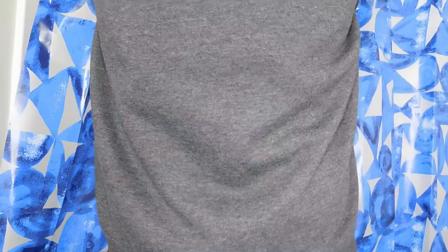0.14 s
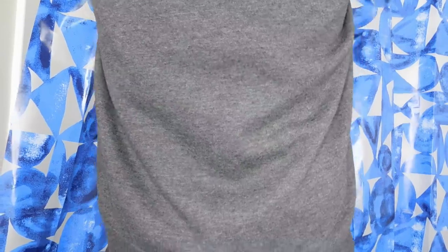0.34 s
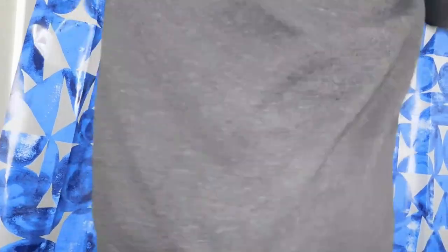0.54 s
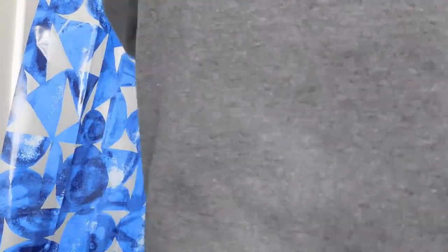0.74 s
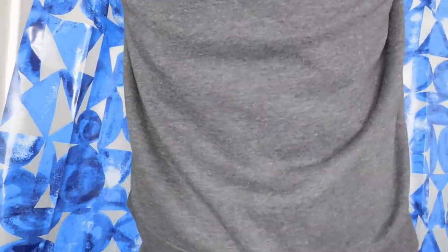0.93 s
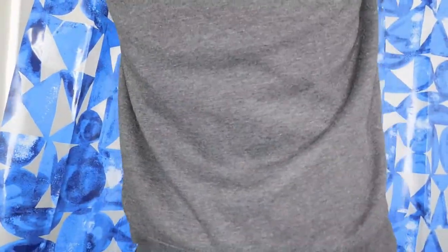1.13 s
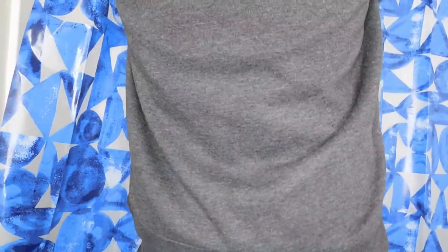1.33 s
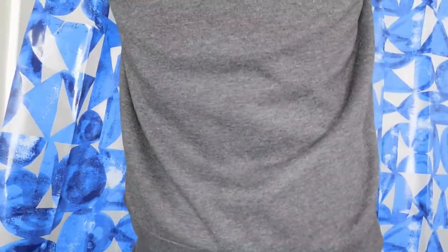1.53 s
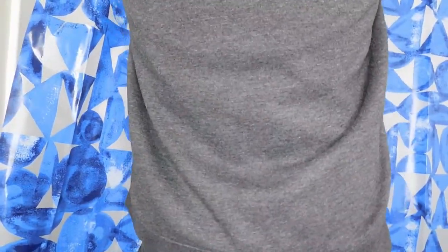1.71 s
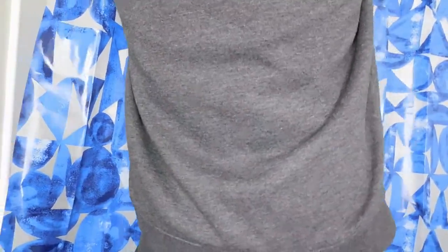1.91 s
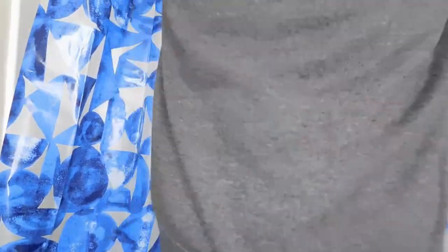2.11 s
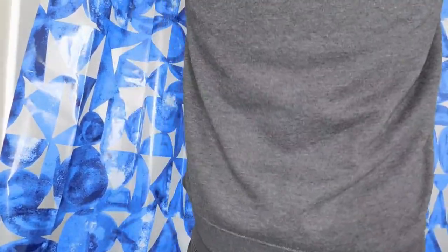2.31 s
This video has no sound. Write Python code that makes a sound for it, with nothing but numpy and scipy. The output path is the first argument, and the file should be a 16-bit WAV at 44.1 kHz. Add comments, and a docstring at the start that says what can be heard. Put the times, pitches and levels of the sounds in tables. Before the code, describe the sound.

Plastic shower curtain rings are hooked onto a rod, close by in a small bathroom. One snaps shut sharply, then rings clack together and knock the rod, while the curtain crinkles and rustles over a faint hiss.

```python
"""Plastic shower curtain rings are hooked onto a rod, close by in a small bathroom.
A ring scrapes over its catch, snaps home and rattles; rings knock the rod and clack together.
The curtain crinkles in short ticks as creases flip over, and rubs along itself in grainy strokes.
Handling stirs faint low booms, over a steady hiss."""
import sys
import numpy as np
from scipy import signal
from scipy.fft import rfft, irfft, next_fast_len
from scipy.io import wavfile
from scipy.ndimage import map_coordinates

SR = 44100
rng = np.random.default_rng(int(sys.argv[2]) if len(sys.argv) > 2 else 0)


def inscribe(sig):
    """Save sig as 16-bit PCM at rate SR to the path in sys.argv[1].

    A 1-D sig is mono; a 2-D sig holds one channel per row.
    Samples are clipped to [-1, 1] before scaling.
    """
    pcm = np.round(np.clip(np.atleast_2d(sig).T, -1, 1) * 32767)
    wavfile.write(sys.argv[1], SR, pcm.astype(np.int16))


N = 103635
TIME_S = np.arange(N) / SR
CONTACT_S = np.arange(-SR // 100, SR // 16) / SR  # time around a contact at 0
AFTER_S = np.maximum(CONTACT_S, 0)
NEAR_CORRELATION = 0.28  # left to right


def amp(db):
    return 10 ** (np.asarray(db) / 20)


def unit_rms(x):
    return x / np.sqrt(np.mean(x ** 2) + 1e-20)


def fixed_energy(x):
    """Scale to the energy of 2 ms at rms 1."""
    return unit_rms(x) * np.sqrt(0.002 * SR / x.shape[-1])


def filtered(x, response):
    """Apply a gain given as a function of Hz."""
    n = x.shape[-1]
    size = next_fast_len(2 * n)
    return irfft(rfft(x, size) * response(np.fft.rfftfreq(size, 1 / SR)), size)[..., :n]


def noise(n, spectrum, correlation=NEAR_CORRELATION, tilt_db=0):
    """Coloured stereo noise of rms 1, tilted by tilt_db per octave."""
    def gain(hz):
        points_hz, points_db = np.transpose(spectrum)
        db = np.interp(np.log(hz + 1), np.log(points_hz + 1), points_db)
        return amp(db + tilt_db * np.log2(hz / 5000 + 0.23))
    mid, side = filtered(rng.standard_normal((2, n)), gain)
    angle = np.arccos(correlation) / 2
    return unit_rms(np.cos(angle) * mid + np.sin(angle) * np.array([side, -side]))


def add(out, at_s, x):
    """Mix in a short sound with its contact at at_s."""
    first = round((at_s + CONTACT_S[0]) * SR)
    lo, hi = max(first, 0), min(first + x.shape[-1], N)
    if hi > lo:
        out[:, lo:hi] += x[..., lo - first:hi - first]


def burst(t60_s, rise_s):
    """Envelope that swells to the contact and dies away."""
    return np.exp(np.minimum(CONTACT_S, 0) / rise_s) * amp(-60 * AFTER_S / t60_s)


def ringing(modes, spread_rad, pitch=1, tilt_db=0):
    """Damped modes, each with a random phase per channel."""
    out = np.zeros((2, len(CONTACT_S)))
    for hz, db, t60_s in modes:
        envelope = amp(db + tilt_db * np.log2(hz / 5000) - 60 * AFTER_S / t60_s)
        phase = rng.normal(0, spread_rad, (2, 1))
        out += envelope * np.cos(2 * np.pi * hz * pitch * AFTER_S + phase)
    return out * (CONTACT_S >= 0)


# Hiss spectrum. Each row: frequency in Hz, density in dB.
HISS_SPECTRUM = [(20, -15), (45, -15), (75, -4), (100, -1), (140, -3), (250, -3.5), (500, -2.5),
                 (1000, -2.5), (2000, -1), (4000, 0), (7000, -2), (10000, -5), (15500, -9.5)]


def hiss():
    """Steady, wide background noise."""
    return amp(-52) * noise(N, HISS_SPECTRUM, correlation=0.086)


def room(x, t60_s=0.13, level_db=-14.5):
    """The walls return a faint short tail."""
    t = np.arange(SR // 3) / SR
    tail = rng.standard_normal((2, len(t))) * amp(-60 * t / t60_s)
    tail /= np.linalg.norm(tail[0])
    return amp(level_db) * signal.fftconvolve(x, tail, axes=1)[:, :N]


# Boom spectrum. Each row: frequency in Hz, density in dB.
BOOM_SPECTRUM = [(25, -22), (50, 2), (75, -9), (102, 8.5), (135, -0.5), (200, -12), (500, -25), (2000, -68)]
# Handling booms. Each row: centre in seconds, level in dB, Gaussian width in seconds.
BOOM_SWELLS = [(0.452, -60.5, 0.016), (0.537, -58, 0.014), (.6, -64, .03), (.92, -69, 0.031),
               (1.02, -74, 0.036), (1.53, -75, .07), (1.8, -69.5, 0.014), (1.92, -62.5, 0.041),
               (2.01, -63.5, 0.022)]


def handling_booms():
    """Soft low swells as the curtain is moved."""
    level = sum(amp(db) * np.exp(-((TIME_S - centre_s) / width_s) ** 2 / 2)
                for centre_s, db, width_s in BOOM_SWELLS)
    return level * noise(N, BOOM_SPECTRUM, correlation=0.11)


# Rustle spectrum. Each row: frequency in Hz, density in dB.
RUSTLE_SPECTRUM = [(100, -17), (400, -10), (1200, -9.5), (2500, -3), (4500, 1.5), (7000, -1), (10000, -4),
                   (15500, -11)]
# Curtain strokes. Each row: start and end in seconds, start and end level in dB.
SLIDE_STROKES = [(.01, 0.048, -53.5, -54.5), (0.362, 0.382, -51, -54), (.409, 0.421, -43.5, -40),
                 (0.438, 0.45, -46, -39), (0.53, 0.558, -46, -49), (0.569, 0.614, -40, -42.5),
                 (0.866, 0.943, -54, -52), (.96, 0.988, -41, -53), (1.302, 1.33, -64, -47),
                 (1.524, 1.535, -58, -50), (1.76, 1.887, -54, -51.5), (2.002, 2.063, -48, -44.5),
                 (2.195, 2.264, -55, -57), (2.296, 2.318, -49, -57)]


def curtain_slides(rise_s=0.0034, fall_s=0.0065, grain_db=2.5, grains_per_s=820):
    """The curtain rubs along itself in grainy strokes."""
    level = np.zeros(N)
    for start_s, end_s, start_db, end_db in SLIDE_STROKES:
        fade = np.exp(np.minimum(TIME_S - start_s, 0) / rise_s - np.maximum(TIME_S - end_s, 0) / fall_s)
        level += fade * amp(np.interp(TIME_S, [start_s, end_s], [start_db, end_db]))
    grain = map_coordinates(rng.standard_normal(N // 10), [TIME_S * grains_per_s], order=1)
    return level * unit_rms(noise(N, RUSTLE_SPECTRUM) * amp(grain_db * grain))


# Plastic tick spectrum. Each row: frequency in Hz, density in dB.
PLASTIC_SPECTRUM = [(100, -23.5), (400, -17.5), (1200, -13.5), (2400, -3.5), (4500, 0), (7000, 1),
                    (10000, -3.5), (15500, -7)]


def plastic_tick(t60_s, tilt_db=0):
    """A tight noise burst: a crease flipping or a ring rattling."""
    colour = noise(len(CONTACT_S), PLASTIC_SPECTRUM, tilt_db=tilt_db)
    return fixed_energy(colour * burst(t60_s, rise_s=0.001))


# Loud creases. Each row: time in seconds, level in dB, T60 in seconds, tilt in dB per octave.
CREASES = [(0.0203, -37.5, 0.02, -4), (0.1121, -44.5, 0.014, -7.5), (.194, -43, 0.027, 6),
           (0.2057, -36.5, 0.0085, -4), (0.2245, -37, 0.021, 1.5), (0.268, -39.5, 0.011, 7.5),
           (0.2801, -38.5, 0.011, -3), (0.2947, -45, 0.029, -3.5), (.3132, -34.5, 0.031, 0.5),
           (0.3398, -41, .04, 2), (0.3729, -41, 0.018, -1.5), (0.3925, -41, 0.0098, 0),
           (.4072, -29, 0.045, -1), (0.46, -30.5, .022, -1.5), (0.5387, -41, 0.015, -10),
           (.576, -31, 0.027, -3), (.635, -43.5, 0.014, 7), (0.8729, -36, 0.045, -1),
           (0.919, -34, 0.032, 0), (.953, -38, .014, -2), (.959, -41, 0.043, -8.5), (1.0247, -34, 0.034, 4),
           (1.1057, -48.5, .012, -10.5), (1.187, -46, 0.011, -3), (1.218, -38.5, 0.015, -3),
           (1.267, -38, .03, -2.5), (1.3308, -36.5, 0.012, 5), (1.3579, -40, 0.0082, 2),
           (1.3814, -37, 0.011, 3), (1.411, -44, .016, 1), (1.442, -43.5, 0.028, -1),
           (1.4608, -39, 0.0044, -3), (1.465, -32.5, 0.038, 0.5), (1.564, -40.5, .013, -2),
           (1.6054, -35.5, 0.0074, 3), (1.6771, -37, 0.022, 3), (1.716, -43, 0.013, -6),
           (1.751, -40.5, .024, 0.5), (1.874, -44, .012, -3), (1.897, -35.5, 0.044, -1.5),
           (1.9323, -34, 0.017, 1), (1.9885, -36, 0.032, -0.5), (2.076, -39.5, 0.023, 0),
           (2.221, -42.5, 0.013, -3)]
# Spans in which the curtain is held. Each row: start and end in seconds.
HELD_SPANS = [(0, .65), (.85, 2.09), (2.181, 2.35)]


def curtain_crinkles(ticks_per_s=55, tick_db=-52, spread_db=3):
    """Creases flip over: single loud ones, and scattered tiny ones while the curtain is held."""
    out = np.zeros((2, N))
    for at_s, db, t60_s, tilt_db in CREASES:
        add(out, at_s, amp(db) * plastic_tick(t60_s, tilt_db))
    for start_s, end_s in HELD_SPANS:
        count = round(ticks_per_s * (end_s - start_s))
        for at_s in rng.uniform(start_s, end_s, count):
            add(out, at_s, amp(rng.normal(tick_db, spread_db)) * plastic_tick(t60_s=0.014))
    return out


# Rod modes. Each row: frequency in Hz before the pitch factor, level in dB, T60 in seconds.
ROD_MODES = [(464, -12, 0.014), (790, -8.5, .012), (1120, -3, 0.02), (1440, -1.5, 0.011), (1930, -13, 0.01),
             (2800, -6, 0.011), (3990, 6, 0.005), (4670, 3.5, 0.0054), (7500, -6, 0.0069)]
# Knocks on the rod. Each row: start in seconds, level in dB.
ROD_KNOCKS = [(0.4936, -42), (1.896, -43), (1.9319, -32)]


def rod_knocks(rise_s=0.0015):
    """A ring knocks the rod, which sounds briefly."""
    out = np.zeros((2, N))
    swell = 1 - np.exp(-AFTER_S / rise_s)
    for at_s, db in ROD_KNOCKS:
        tone = ringing(ROD_MODES, spread_rad=0.75, pitch=0.95)
        add(out, at_s, amp(db) * fixed_energy(tone * swell))
    return out


# Modes of the struck ring. Each row: frequency in Hz, level in dB, T60 in seconds.
NEIGHBOUR_MODES = [(2390, -20, 0.018), (3390, -10, 0.0085), (4460, 0.5, 0.014), (5280, -2.5, 0.0086),
                   (5870, -9, 0.011), (8300, 1.5, 0.0082), (9140, -3, 0.011), (12470, -4, .006)]
# Ring-on-ring clacks. Each row: start in seconds, level in dB.
RING_CLACKS = [(0.976, -26.5)]


def ring_clacks(rise_s=0.0005, chatter_db=0.5):
    """A ring meets its neighbour, which rings while the two chatter."""
    out = np.zeros((2, N))
    swell = 1 - np.exp(-AFTER_S / rise_s)
    for at_s, db in RING_CLACKS:
        tone = fixed_energy(ringing(NEIGHBOUR_MODES, spread_rad=0.76) * swell)
        chatter = amp(chatter_db) * plastic_tick(t60_s=0.03)
        add(out, at_s, amp(db) * (tone + chatter))
    return out


# Snapping ring modes. Each row: frequency in Hz before the pitch factor, level in dB, T60 in seconds.
RING_MODES = [(1260, -1, 0.0059), (2410, 9, 0.005), (3360, 12.5, 0.0031), (4920, 12.5, 0.012),
              (6640, 5.5, 0.0062), (7150, 14, 0.0033), (9500, 4, 0.011), (11250, 8, 0.0049),
              (14000, 10, 0.007), (15100, 6, 0.0068)]
# Snaps. Each row: time in seconds, level in dB, scrape and rattle in dB relative to the snap,
# rattle T60 in seconds, pitch factor, mode tilt in dB per octave.
RING_SNAPS = [(0.4945, -37, -2, 5, 0.0097, 1.01, 0), (.5270, -19, -7.5, -19, 0.022, 0.99, -0.5),
              (2.0633, -36, -6.5, 2.5, 0.015, 1.05, -0.5)]


def ring_snaps(crack_db=17, scrape_s=0.0047, low_cut_hz=590):
    """A ring scrapes over its catch, snaps and rattles; being small, it radiates little bass."""
    out = np.zeros((2, N))
    n = len(CONTACT_S)
    low_cut = signal.butter(2, low_cut_hz, "high", fs=SR, output="sos")
    lead_in = np.exp(-(2 * CONTACT_S / scrape_s + 1) ** 2)
    for at_s, db, scrape_db, rattle_db, rattle_t60_s, pitch, tilt_db in RING_SNAPS:
        crack = amp(crack_db) * noise(n, PLASTIC_SPECTRUM) * burst(t60_s=0.0065, rise_s=0.00027)
        tone = ringing(RING_MODES, spread_rad=1.0, pitch=pitch, tilt_db=tilt_db)
        snap = fixed_energy(signal.sosfilt(low_cut, tone + crack))
        scrape = amp(scrape_db) * fixed_energy(noise(n, PLASTIC_SPECTRUM) * lead_in)
        rattle = amp(rattle_db) * plastic_tick(rattle_t60_s, tilt_db / 2)
        add(out, at_s, amp(db) * (scrape + snap + rattle))
    return out


def scene(left_lag_s=12e-6):
    """Rings and curtain close by in the room, over hiss and booms."""
    background = hiss() + handling_booms()
    near = curtain_slides() + ring_snaps() + rod_knocks() + ring_clacks() + curtain_crinkles()
    delay_s = np.array([[0.5], [-0.5]]) * left_lag_s
    near = filtered(near, lambda hz: np.exp(-2j * np.pi * hz * delay_s))
    return background + near + room(near)


def record(dry, top_hz=16000):
    """Brick-wall low-pass."""
    return filtered(dry, lambda hz: hz < top_hz)


dry = scene()
out = record(dry)
inscribe(out)
```